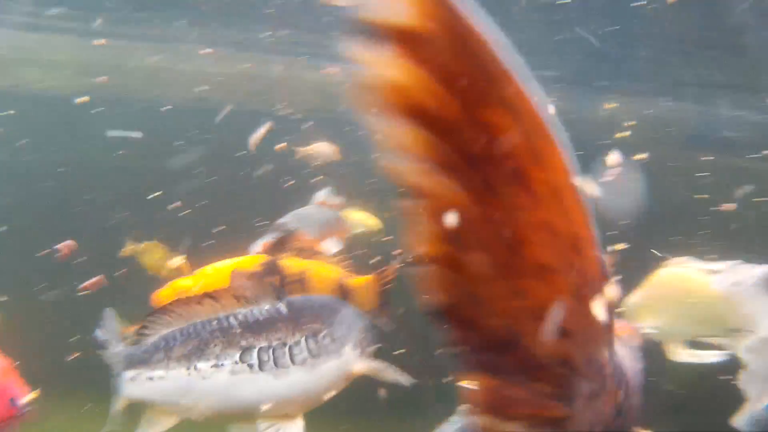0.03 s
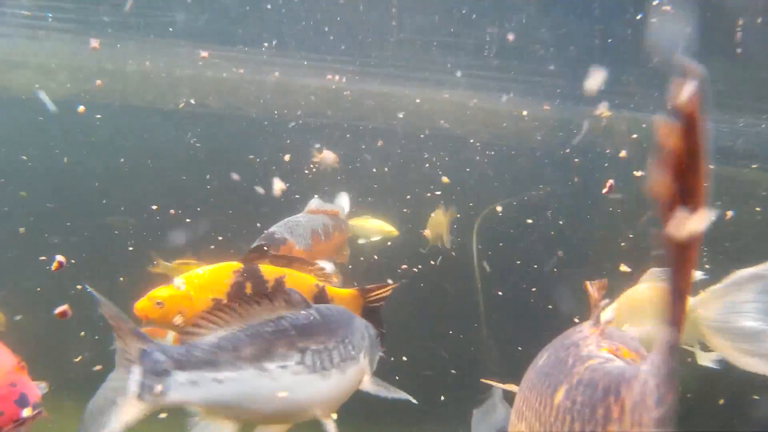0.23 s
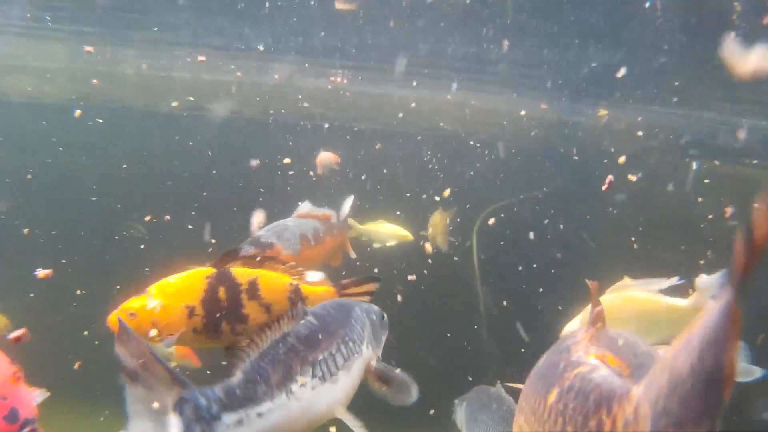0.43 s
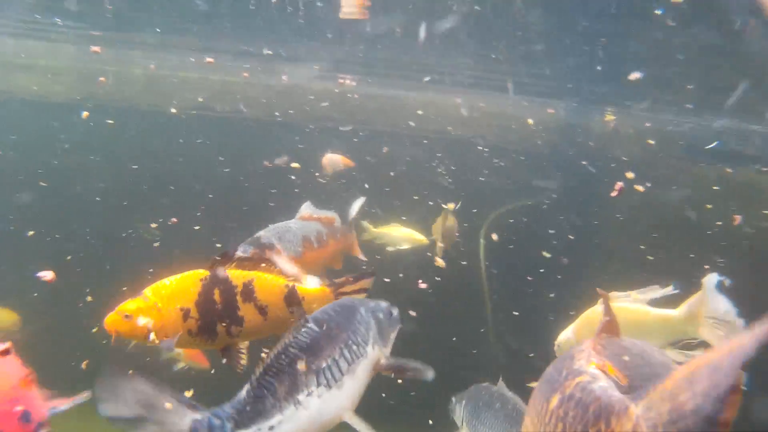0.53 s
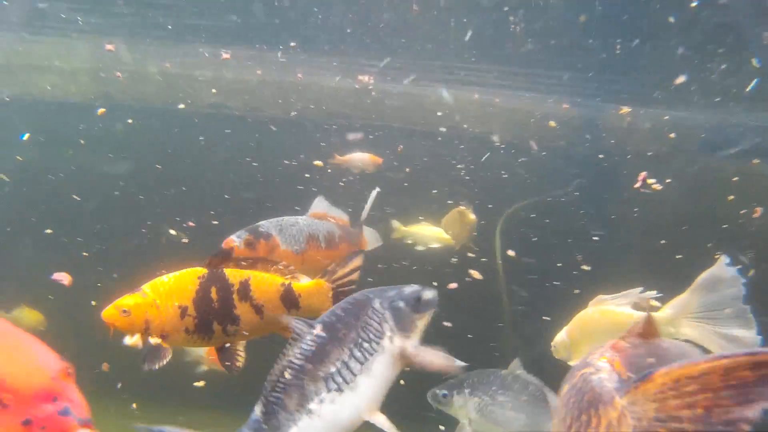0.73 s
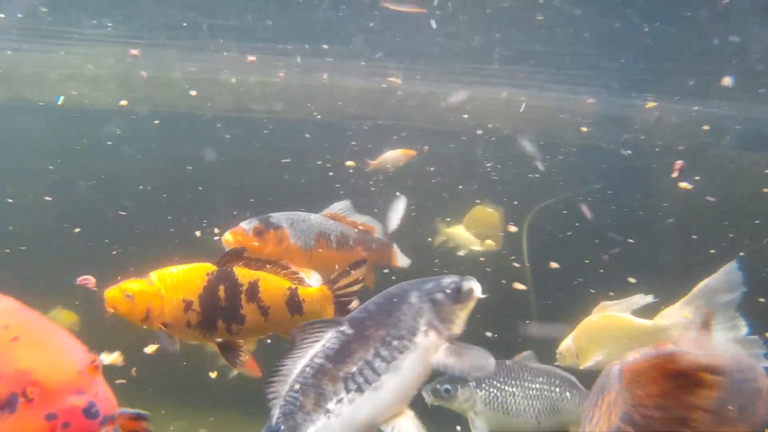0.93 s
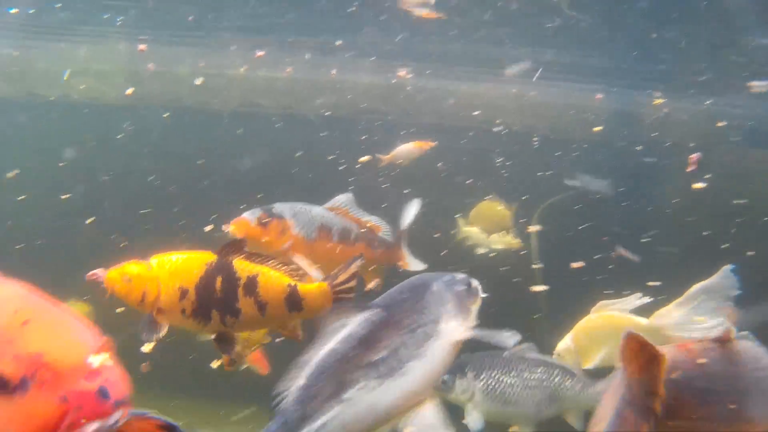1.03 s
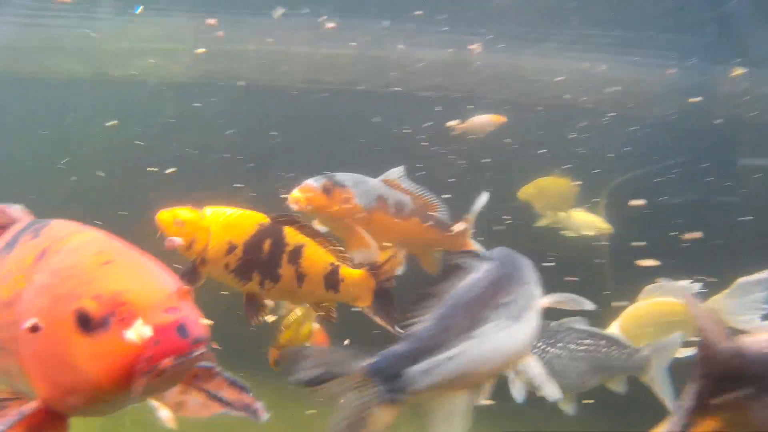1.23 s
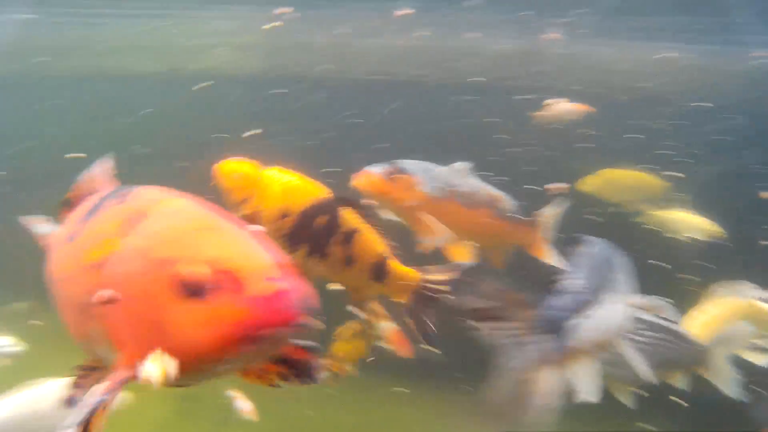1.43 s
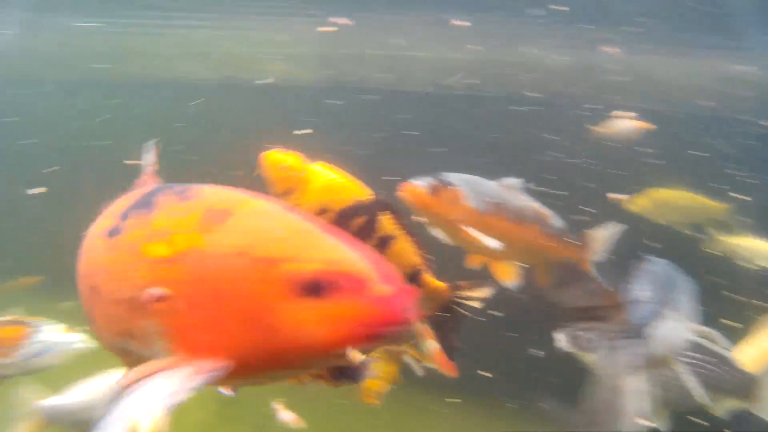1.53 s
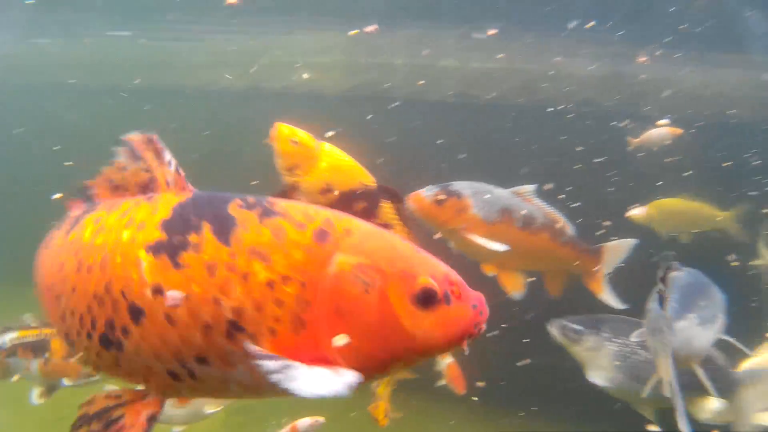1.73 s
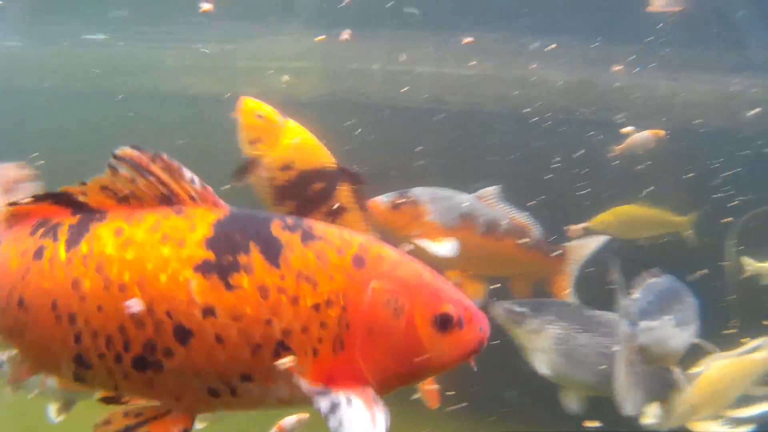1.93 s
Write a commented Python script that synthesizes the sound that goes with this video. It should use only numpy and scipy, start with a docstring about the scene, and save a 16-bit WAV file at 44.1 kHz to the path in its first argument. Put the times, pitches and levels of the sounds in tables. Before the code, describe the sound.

Close underwater sloshing, with knocks, gulps and crackling tiny bubbles, comes as a fish's fin passes the microphone in a pond. Gentler thumps and light ticks of grit come next, before only faint bubbles and hiss remain.

```python
"""Carp swim around a camera under the surface of a pond. It opens on a quiet hiss and faint far bubbles.
At 0.2 s a fin sweeps past: water shoves and knocks the housing, air pockets gulp, the deep ones mostly
rising in pitch, and bursts of tiny bubbles squelch until about 0.7 s. Around 1 s come softer surges
and a few ticks of grit. The last eddies and far bubbles then sink back towards the hiss."""
import sys
import numpy as np
from scipy import signal
from scipy.fft import rfft, irfft
from scipy.io import wavfile

SR = 44100
rng = np.random.default_rng(int(sys.argv[2]) if len(sys.argv) > 2 else 0)


def int16_out(signal):
    """Quantize to a 16-bit WAV file."""
    q = np.round(np.clip(np.atleast_2d(signal).T, -1, 1) * 32767)
    wavfile.write(sys.argv[1], SR, q.astype(np.int16))


N = 88200
T, HZ = np.arange(N) / SR, np.fft.rfftfreq(N, 1 / SR)
TOP_HZ = 16300


def amp(db):
    """Decibels to gain."""
    return 10 ** (np.asarray(db) / 20)


def unit(x):
    """Scales to rms 1."""
    return x / np.sqrt(np.mean(x ** 2) + 1e-20)


def eq_curve(points):
    """Gain at every frequency from (f/Hz, level/dB) points."""
    f, db = np.transpose(points)
    return amp(np.interp(np.log(HZ + 1), np.log(f), db))


def noise(gain):
    """Noise of rms 1 with the given spectrum."""
    return unit(irfft(rfft(rng.standard_normal(N)) * gain, N))


def ramp(u):
    """Smooth step from 0 to 1."""
    return np.sin(np.pi / 2 * np.clip(u, 0, 1)) ** 2


def decay(t, t60):
    """Exponential decay after time zero."""
    return np.exp(-np.log(1000) * np.maximum(t, 0) / t60)


def envelope(rows):
    """Sum of attack-hold-release swells, one a row."""
    return sum(amp(db) * ramp((T - start) / attack) * decay(T - start - attack - hold, t60)
               for start, attack, hold, t60, db in rows)


# resonances of the camera housing: f/Hz, relative level/dB, t60/s
HOUSING_MODES = [(354, -17, 0.2), (533.1, -4, 0.19), (801, 5.5, 0.066), (1313, 4, 0.044), (1581, -5, 0.1),
                 (1834, -7, 0.13), (2060, -2.5, 0.029), (2503, -6.5, 0.06), (3100, -1.5, 0.029),
                 (3260, -4, 0.019), (3640, -8, 0.024), (3942, 1.5, 0.011), (4760, 1.5, 0.011),
                 (6140, -19, 0.017), (8030, -8.5, 0.01), (9950, -26, 0.007)]
def housing(x):
    """The housing rings in its damped modes when x drives it."""
    t = T[:SR // 4]
    ring = sum(amp(db) * decay(t, t60) * np.sin(2 * np.pi * hz * t) for hz, db, t60 in HOUSING_MODES)
    return signal.fftconvolve(x, ring / np.linalg.norm(ring))[:N]


# tone of the reverb tail: f/Hz, relative level/dB
POND_EQ = [(100, -7), (700, -7), (1100, -9), (2000, -0.5), (3300, 3), (5000, -10), (8000, -0.5),
           (16000, -20)]
def pond_reverb(x, attack_s=0.026, t60=0.45, wet_db=-19):
    """Diffuse echo between the pond's walls and surface."""
    tail = (noise(eq_curve(POND_EQ)) * ramp(T / attack_s) * decay(T, t60))[:SR // 2]
    return amp(wet_db) * signal.fftconvolve(x, tail / np.linalg.norm(tail))[:N]


# tone of the hiss bed: f/Hz, relative level/dB
HISS_EQ = [(25, -5), (60, -9.5), (130, -14.5), (300, -17.5), (600, -24), (1100, -20), (1350, -29),
           (1800, -18), (2600, -29.5), (3100, -24.5), (4500, -30.5), (7000, -31), (10000, -31),
           (16000, -33.5)]
def hiss_bed(hiss_db=-60.5, ring_db=-72):
    """Steady hiss with a murmur of the housing under it."""
    return amp(hiss_db) * noise(eq_curve(HISS_EQ)) + amp(ring_db) * housing(noise(1))


# electronic tones: f/Hz, level/dB
WHINE_TONES = [(9489, -76), (9562, -75)]
def camera_whine(halo_hz=60, halo_db=-84.5):
    """Thin whine of the electronics in a narrow halo of noise."""
    tones = sum(amp(db) * np.sin(2 * np.pi * hz * T) for hz, db in WHINE_TONES)
    halo = noise(sum(np.exp(-.5 * ((HZ - hz) / halo_hz) ** 2) for hz, _ in WHINE_TONES))
    return tones + amp(halo_db) * halo


# washes of distant fizz: t/s, length/s, centre f/Hz, level/dB
FIZZ_CLOUDS = [(-.05, 0.26, 1900, -66), (0.25, 0.2, 3350, -57.5), (0.688, 0.64, 1670, -63),
               (0.754, 0.18, 3340, -66.5), (1.374, 0.16, 2580, -65.5), (1.586, 0.32, 1750, -63.5),
               (1.804, 0.19, 2090, -64.5), (1.84, .13, 4240, -65.5)]
def fizz(width_octaves=0.23, ring_db=-4):
    """Soft clouds of distant bubbles, partly coloured by the housing."""
    out = np.zeros(N)
    for start, length, hz, db in FIZZ_CLOUDS:
        cloud = noise(np.exp(-.5 * (np.log2((HZ + 1) / hz) / width_octaves) ** 2))
        arch = np.sin(np.pi * np.clip((T - start) / length, 0, 1))
        out += amp(db) * arch * unit(cloud + amp(ring_db) * unit(housing(cloud)))
    return out


# single distant bubbles: t/s, f/Hz, level/dB, t60/s
FAR_PINGS = [(.035, 788, -46, 0.2), (0.121, 1865, -50.5, 0.6), (0.8, 1783, -44.5, .15),
             (0.926, 1780, -53, 0.29), (1.626, 1838, -53.5, 0.17), (1.819, 2290, -46.5, 0.11),
             (1.818, 3160, -54.5, 0.27), (1.867, 2130, -54.5, 0.36)]
def far_bubbles(attack_s=0.0088, waver=0.0306, waver_hz=120):
    """Bubbles ring across the pond as faint, wavering pings."""
    out = np.zeros(N)
    for start, hz, db, t60 in FAR_PINGS:
        pitch = hz * (1 + waver * noise(np.exp(-(HZ / waver_hz) ** 2)))
        level = amp(db) * ramp((T - start) / attack_s) * decay(T - start, t60)
        out += level * np.sin(2 * np.pi * np.cumsum(pitch) / SR)
    return out


# swells of churning water: t/s, attack/s, hold/s, release t60/s, level/dB
EDDY_SWELLS = [(.165, 0.07, 0.048, 0.36, -42), (.39, 0.019, .085, 0.15, -43),
               (.565, 0.023, 0.032, 0.29, -45), (.96, .05, 0.027, 0.11, -46.5),
               (1.068, 0.0041, 0.016, 0.22, -46.5), (1.41, 0.058, 0.076, 0.29, -70),
               (1.75, 0.03, 0.046, 0.45, -57.5)]
# their dark tone: f/Hz, relative level/dB
EDDY_EQ = [(20, 4.5), (60, -3), (120, -9.5), (200, -10), (330, -12.5), (600, -15.5), (1200, -20),
           (4000, -37), (16000, -49)]
def eddies():
    """Low churning of the water stirred behind passing fish."""
    return envelope(EDDY_SWELLS) * noise(eq_curve(EDDY_EQ))


# soft low thumps: crest t/s, half length/s, level/dB
TAIL_BEATS = [(0.977, 0.0062, -34), (1.02, 0.0086, -27), (1.084, 0.015, -36), (1.44, 0.0035, -50.5),
              (1.472, 0.012, -46), (1.769, 0.0086, -36)]
def surges(trough_lag=1, trough_width=3.3):
    """A tail beat sends a smooth crest of pressure, then a broader trough."""
    out = np.zeros(N)
    for crest, half, db in TAIL_BEATS:
        u = (T - crest) / half  # time, lag and width count in half lengths
        trough = np.exp(-((u - trough_lag) / trough_width) ** 2) / trough_width
        out += amp(db) * (np.exp(-u ** 2) - trough)
    return out


# thuds of water on the housing: t/s, time scale/s, peak level/dB
WATER_THUDS = [(0.2046, 0.0012, -17), (0.2268, 0.00072, -13), (0.273, 0.0055, -34), (.3262, 0.00047, -26),
               (.4072, 0.0011, -19.5), (0.4415, 0.0012, -23), (.574, 0.0026, -34.5), (1.756, 0.0016, -43),
               (1.802, 0.0012, -43)]
def shoves():
    """Water hits the housing with a push of pressure, then a longer suction."""
    out = np.zeros(N)
    for start, scale, db in WATER_THUDS:
        u = np.maximum(T - start, 0) / scale
        pressure = u ** 2 * (3 - u) * np.exp(-u)  # push turns to suction at u = 3
        out += amp(db) * pressure / pressure.max()
    return out


# bright sizzle of the finest bubbles: t/s, attack/s, hold/s, release t60/s, level/dB
SPRAY_BURSTS = [(.21, 0.0016, 0.01, 0.021, -51.5), (.463, .004, 0.046, 0.14, -54.5),
                (.564, 0.0051, 0.055, 0.12, -43.5), (.652, 0.002, .008, 0.046, -44)]
def spray(lowest_hz=2800, pitches=24, per_s=3500, spread_db=3.5, ring_cycles=3.3, db_per_octave=-7):
    """Minute bubbles each ring for a few cycles; the smaller, the higher and fainter."""
    out, t = np.zeros(N), T[:400]
    for hz in np.geomspace(lowest_hz, TOP_HZ, pitches):
        ping = np.exp(-t * hz / ring_cycles) * np.sin(2 * np.pi * hz * t)
        strength = amp(spread_db * np.minimum(rng.exponential(1, N), 3))
        births = strength * (rng.random(N) < per_s / pitches / SR)
        tilt = amp(db_per_octave * np.log2(hz / lowest_hz))
        out += tilt * signal.oaconvolve(births, ping)[:N]
    return unit(out) * envelope(SPRAY_BURSTS)


# wet crackle of tiny bubbles: t/s, attack/s, hold/s, release t60/s, drive level/dB
SQUELCH_BURSTS = [(.21, 0.0013, 0.0013, 0.038, -32.5), (.233, 0.0016, 0.0035, 0.12, -45.5),
                  (.456, 0.006, 0.027, 0.056, -39), (.531, 0.0073, 0.037, 0.04, -44.5),
                  (.563, 0.0014, 0.044, 0.11, -32.5), (.653, 0.0021, 0.0027, 0.02, -42.5)]
# tone of the pops heard directly: f/Hz, relative level/dB
POP_EQ = [(60, -43), (300, -14), (700, -3), (1080, -30.5), (1600, 15), (2700, -1), (3800, -3),
          (6000, -13.5), (9000, -8.5), (16000, -21.5)]
def squelch(per_s=5000, spread_db=3, low_cut_hz=585, direct_db=-6.5):
    """Dense tiny pops with little bass, heard directly and through the housing."""
    strength = amp(spread_db * np.minimum(rng.exponential(1, N), 4))
    clicks = strength * rng.choice([-1, 1], N) * (rng.random(N) < per_s / SR)
    pops = unit(clicks) * envelope(SQUELCH_BURSTS)
    thin = signal.lfilter(*signal.butter(2, low_cut_hz, "high", fs=SR), pops)
    direct = irfft(rfft(thin) * unit(eq_curve(POP_EQ)), N)
    return housing(thin) + amp(direct_db) * direct


# knocks and ticks of grit: centre t/s, f/Hz, level/dB, half length/s, send to the housing/dB
HOUSING_HITS = [(0.2147, 606, -11, 0.0012, -19.5), (0.2147, 1840, -26.5, 0.00076, -8.5),
                (0.211, 4270, -30, 0.00019, 1), (0.223, 8540, -45, 0.0011, -15),
                (0.223, 12100, -47.5, .001, -17), (0.281, 363, -28.5, 0.00056, -14),
                (0.3293, 612, -26, 0.0025, -25), (0.4105, 300, -14, 0.0011, -39),
                (0.4143, 226.5, -16, 0.0036, -44), (0.6943, 670, -27, 0.0011, -11),
                (.694, 1250, -31, 0.00075, -20), (1.022, 2720, -33, 0.00022, -10),
                (1.0567, 4400, -36, 0.00014, -8), (1.0785, 9200, -34.5, 0.00016, -15),
                (1.0826, 4670, -30, 0.00058, -8), (1.083, 880, -44.5, 0.00035, -0.5),
                (1.0834, 2400, -34, 0.00021, -8), (1.085, 3400, -40, 0.0012, 1.5),
                (1.1, 4540, -46, 0.00065, -15)]
def knocks():
    """Very short blows that leave the housing ringing."""
    direct, send = np.zeros(N), np.zeros(N)
    for centre, hz, db, half, send_db in HOUSING_HITS:
        t = T - centre
        blow = amp(db) * np.exp(-(t / half) ** 2) * np.sin(2 * np.pi * hz * t)
        direct += blow
        send += amp(send_db) * blow
    return direct + housing(send)


# close gulps: t/s, starting f/Hz, glide/(Hz/s), level/dB, attack/s, t60/s, life/s
AIR_POCKETS = [(.2135, 727, 1500, -19, 0.00033, 0.054, 0.031),
               (.229, 518.5, 728, -17, 0.0023, 0.068, 0.037), (0.26, 1760, -9000, -34, 0.0032, .05, 0.032),
               (0.282, 1295, 497, -31.5, 0.0068, 0.17, 0.014),
               (0.289, 1560, 24998, -38, 0.0024, 0.05, 0.013),
               (0.301, 1320, -1000, -35, 0.0057, 0.041, 0.02), (.333, 700, 6498, -31, 0.0031, 0.14, 0.02),
               (0.394, 1890, -3, -37, 0.0017, 0.028, 0.016),
               (0.4132, 301, 11511, -16.5, 0.0016, 0.25, 0.023),
               (0.4416, 473, 4000, -21.5, 0.0024, 0.2, .008),
               (.451, 508, 8992, -25.5, 0.0013, 0.35, 0.0065), (.463, 674, 9003, -25, 0.00067, 0.26, .022),
               (.465, 1817, -3000, -20, 0.0024, .04, 0.0064),
               (0.4746, 1847, 0, -17.5, 0.0032, 0.025, 0.018),
               (0.49, 520.6, 5497, -14, 0.00067, 0.074, .016),
               (.492, 2110, -15000, -26.5, 0.0013, 0.024, 0.0079), (.515, 587, 0, -34.5, 0.0038, 0.1, .018),
               (.536, 718, 3000, -30, 0.001, 0.061, 0.037), (.536, 1490, -4, -21, 0.0029, 0.015, 0.0068),
               (0.565, 1288, -4, -27, 0.0027, 0.19, 0.035),
               (0.567, 3102, -3000, -25.5, 0.0012, 0.054, 0.016),
               (.582, 3080, 0, -26.5, 0.0044, 0.096, 0.012), (0.586, 4750, -4, -25.5, 0.00038, 0.012, .006),
               (.604, 4000, 0, -28, 0.0017, 0.04, 0.0065), (.598, 769, 803, -19.5, 0.0016, 0.056, 0.054),
               (.603, 1322, 0, -27, 0.00067, 0.087, 0.024), (.617, 1875, 1994, -26.5, .003, 0.11, 0.012),
               (.655, 1840, 4, -34, 0.0026, 0.059, 0.011),
               (1.0818, 4800, -100000, -21.5, .0005, 0.0089, .006)]
def gulps(wobble=0.029, wobble_hz=150, flutter_db=0.14, burst_s=0.0028, ring_db=-30):
    """Each air pocket rings, wobbles, glides as it nears the surface, and bursts; the housing rings along."""
    out = np.zeros(N)
    slow = np.exp(-(HZ / wobble_hz) ** 2)
    drift = np.cumsum(wobble * noise(slow)) / SR  # time warp that wobbles the pitch
    flutter = amp(flutter_db * noise(slow))
    for start, hz, glide, db, attack, t60, life in AIR_POCKETS:
        t = np.maximum(T - start, 0)
        gate = ramp((life - t) / burst_s + .5)  # bursting chokes the ring
        level = amp(db) * ramp(t / attack) * decay(t, t60) * gate
        cycles = hz * (t + drift - np.interp(start, T, drift)) + glide * t ** 2 / 2
        out -= level * np.sin(2 * np.pi * cycles)
    out *= flutter
    return out + amp(ring_db) * housing(out)


def scene():
    """Mono mix: close sounds with their reverb, over moving water and the distant bed."""
    close = gulps() + knocks() + squelch() + spray()
    water = shoves() + surges() + eddies()
    reverb = pond_reverb(close)
    bed = far_bubbles() + fizz() + camera_whine() + hiss_bed()
    return (bed + water + reverb + close)[None]


def record(dry):
    """A steep low-pass trims the very top of the treble."""
    low_pass = signal.firwin(511, TOP_HZ, window=("kaiser", 9), fs=SR)
    return signal.oaconvolve(dry, low_pass[None], "same")


dry = scene()
out = record(dry)
int16_out(out)
```